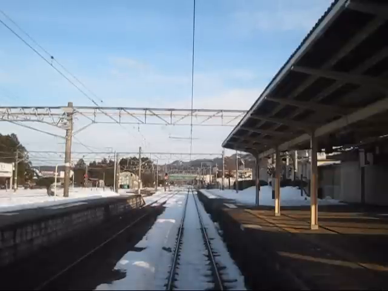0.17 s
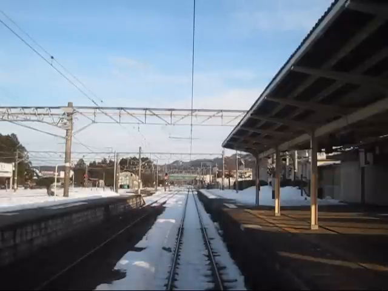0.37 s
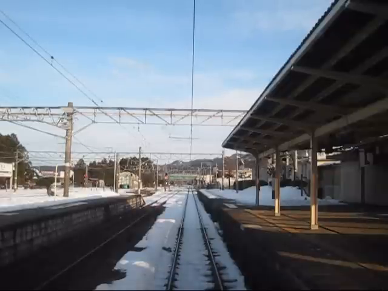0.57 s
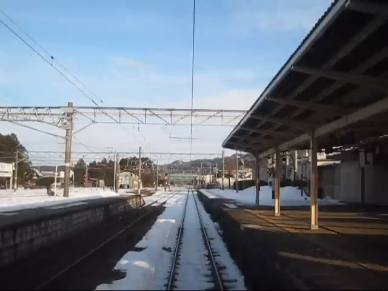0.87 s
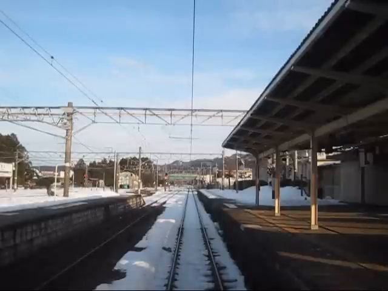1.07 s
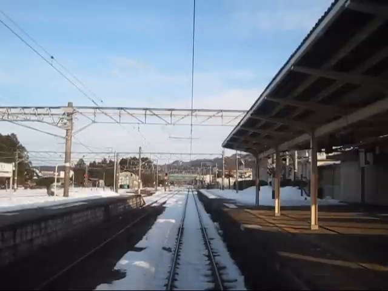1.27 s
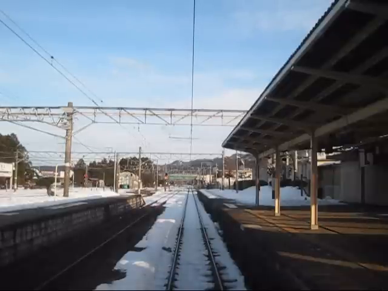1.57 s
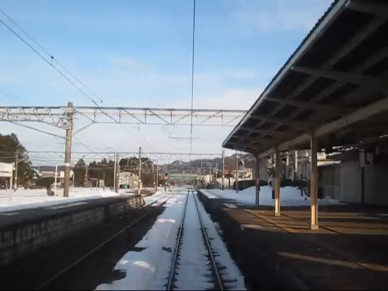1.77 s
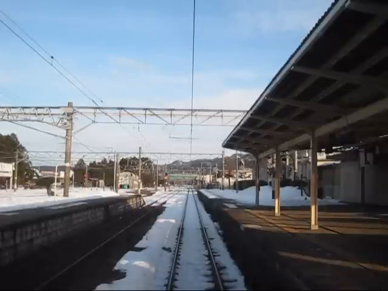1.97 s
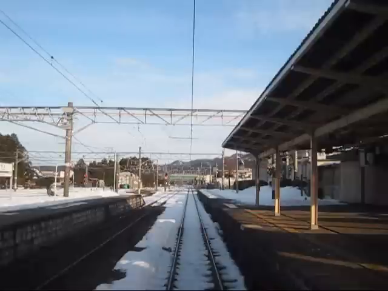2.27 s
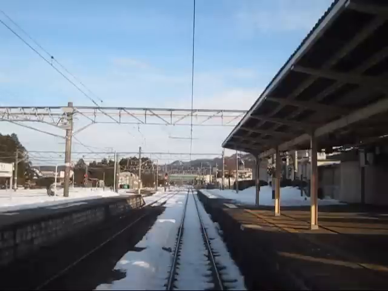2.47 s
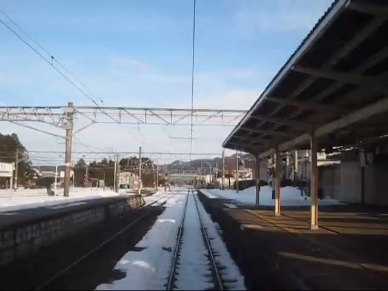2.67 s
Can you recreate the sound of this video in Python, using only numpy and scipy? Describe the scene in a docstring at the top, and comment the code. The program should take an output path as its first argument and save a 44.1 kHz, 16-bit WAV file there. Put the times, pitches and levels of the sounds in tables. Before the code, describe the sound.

Steady pressurised air hiss with a breathy, whistling colour, heard close inside a train cab. Low machinery drone and uneven floor rumble lie beneath; late on, the jet sinks and soft, dull clunks cluster at the end.

```python
"""Compressed air vents from a valve, heard inside the cab of a standing train: the jet swells, then sinks
as the pressure falls. It is noise in four bands, coloured by the valve housing, nozzle, pipes and small cab.
Thin high hisses, narrow bands of noise, hold at the start and fade.
Near the end the car body clunks as decaying sines, and a dull rushing noise grows under the last clunks.
Behind it all, shaped noise makes the floor rumble, a steady machinery drone and the cab air."""
import sys
import numpy as np
from scipy import signal
from scipy.fft import rfft, irfft, next_fast_len
from scipy.io import wavfile
from scipy.ndimage import uniform_filter1d, map_coordinates

SR = 44100
rng = np.random.default_rng(int(sys.argv[2]) if len(sys.argv) > 2 else 0)


def unload_audio(sound):
    """Save the sound as a 16-bit wav file, at the path given as the first command line argument."""
    columns = np.transpose(np.atleast_2d(sound))
    # keep every value between -1 and 1, then stretch to whole-number steps
    steps = np.round(np.clip(columns, -1, 1) * 32767)
    wavfile.write(sys.argv[1], SR, steps.astype(np.int16))


N = 123479

# Cab air noise, spectrum: [f/Hz, relative gain/dB]
AIR_COLOUR = [(120, -13), (200, 0.5), (343, -2), (831, -8), (1060, 0.5), (1150, -7), (1500, -7),
              (1950, -86), (3300, -120)]
# Steady machinery, resonances: [f/Hz, width/Hz, relative level/dB]
DRONE_PEAKS = [(147, 19, -3.5), (229, 30, 1), (300, 23, -2.5), (458, 34, -7.5)]
AIR_DB, DRONE_DB = -44, -44  # rms levels

# Vibration through the floor: [t/s, deep level/dB, boom level/dB]
RUMBLE_LEVELS = [(0.0, -47, -35), (0.06, -38, -52), (0.56, -44, -52), (1.1, -34.5, -31.5), (1.16, -38, -39),
                 (1.21, -39.5, -29.5), (1.35, -28.5, -36), (1.48, -34, -30.5), (1.78, -26.5, -36),
                 (2.3, -39, -42), (2.39, -25.5, -29.5), (2.47, -28.5, -35), (2.55, -27, -38.5),
                 (2.63, -32, -37)]
# Deep part, spectrum: [f/Hz, relative gain/dB]
DEEP_COLOUR = [(12, -35), (20, -6), (54, -1), (130, -6), (170, -36), (290, -120)]
# Boomy part, resonances: [f/Hz, width/Hz, relative level/dB]
BOOM_PEAKS = [(162, 19.5, -7), (122, 19, -9), (196, 68, -20)]

# Dull rushing noise, resonances: [f/Hz, width/Hz, relative level/dB]
SCRAPE_PEAKS = [(373, 120, -1), (600, 390, 1)]
SCRAPE_END_DB, SCRAPE_RISE_DB_PER_S, SCRAPE_PATCHY_DB = -36, 150, 1.5

# Blows to the car body: [t/s, gain/dB, extra gain of the modes above the lowest/dB]
BLOWS = [(2.372, -16, -10), (2.394, -24, -3), (2.675, -13, 4), (2.693, -10.5, 3.5), (2.707, -7, 6.5),
         (2.723, -10, -6), (2.759, -13, 2), (2.775, -7, -17), (2.786, -15, -21)]
# Ringing modes of the car body: [f/Hz, relative level/dB, t60/s]
BODY_MODES = [(72.4, 8, 0.05), (151.7, -8.5, 0.15), (213, -13, 0.044), (298, -14.5, 0.045),
              (390, -24, 0.029), (527, -26, 0.024)]
CLUNK_RISE_S = 0.0029

# Thin high hisses at the start: [f/Hz, width/Hz, level/dB, hold/s, t60/s]
SPIT_BANDS = [(9700, 700, -31, .1, .4), (10130, 120, -39, .26, .15)]

# Jet level in each band: [t/s, low level/dB, body level/dB, middle level/dB, treble level/dB]
JET_LEVELS = [(0.0, -40, -20, -31, -34), (0.27, -38, -21, -31, -33.5), (0.33, -33, -20.5, -29, -31.5),
              (0.37, -33.5, -17.5, -28, -31.5), (0.61, -37, -19, -29.5, -32.5),
              (0.65, -39.5, -21, -30, -33.5), (0.72, -39, -18.5, -31.5, -33),
              (1.25, -39.5, -20.5, -30, -32.5), (2.42, -44.5, -25.5, -36, -37.5),
              (2.46, -55, -24.5, -36, -39), (2.49, -41.5, -26, -35.5, -35.5), (2.7, -50, -27.5, -38, -42.5),
              (2.77, -53, -31.5, -43, -43), (2.78, -50, -30.5, -43.5, -45), (2.8, -53, -29.5, -41, -42)]
BODY_HZ, MIDDLE_HZ, TREBLE_HZ = 1450, 4000, 7900  # lower edges of the upper three bands
# Broad hiss of the jet, spectrum: [f/Hz, relative gain/dB]
JET_COLOUR = [(200, -53), (350, -26.5), (835, -24.5), (1440, -23), (1730, -14), (2250, -3), (3000, -11),
              (3800, -17), (5000, -18.5), (7890, -24.5), (8600, -16.5), (9600, -15), (10300, -19.5),
              (11500, -21), (12400, -26), (13000, -26), (15600, -35)]
# Broad resonances of the valve housing: [f/Hz, width/Hz, relative level/dB]
HOUSING_PEAKS = [(1069, 94, -13.5), (1240, 55, -16), (1771, 34.6, 6), (1715, 60, -2), (2236, 155, 2),
                 (2786, 73, -12), (2837, 68, -7.5), (3360, 140, -10), (3511, 164, -6), (4105, 98, -12.5),
                 (4550, 35, -8.5), (4730, 99, -11), (5056, 44, -13), (5376, 99, -11.5)]
# High resonances of the nozzle: [f/Hz, width/Hz, relative level/dB]
NOZZLE_PEAKS = [(6150, 30, 4.5), (6590, 70, 2.5), (7036, 35, -3), (8770, 510, 8), (9040, 40, 11.5),
                (9550, 460, 6), (10200, 50, 8), (10300, 66, 5), (10700, 43, 1), (11600, 65, 5),
                (12900, 300, -10)]
# Narrow resonances of the pipes, used relative to the strongest: [f/Hz, level/dB]
PIPE_TONES = [(1050, -48), (1803, -37), (1852, -42), (2067, -37), (2164, -36), (2207, -33), (2283, -35),
              (2336, -35), (2412, -40), (2466, -40), (2589, -41), (2654, -44), (2778, -44), (2864, -41),
              (3182, -47), (3338, -43), (3472, -41), (3537, -40), (3967, -50), (4032, -49), (4554, -48),
              (4710, -47), (4980, -47), (5459, -49)]
PIPE_WIDTH_HZ = 9.7
# Cancellations in the cab: [f/Hz, width/Hz, depth/dB]
CAB_NOTCHES = [(3105, 50, -14), (5290, 180, -9), (7980, 120, -7), (10500, 200, -4)]
BROAD_DB, HOUSING_DB, NOZZLE_DB, PIPES_DB = -7.5, -7, -25, 4.5  # mix of the jet's paths
FLUTTER_DB, JET_PATCHY_DB = 0.58, 0.37
CAB_T60_S, CAB_DB = 0.17, -0.5  # dense cab echoes, level against the direct hiss

LOW_CUT_HZ, TOP_HZ = 15, 15700  # limits at the microphone


def amp(db):
    """Amplitude factor of a level in dB."""
    return 10 ** (np.asarray(db) / 20)


def unit(x):
    """Scale to rms 1."""
    return x / np.sqrt(np.mean(x ** 2) + 1e-20)


def along(points, hz):
    """Amplitude response through (f/Hz, gain/dB) points, joined on a log frequency axis."""
    f, db = np.transpose(points)
    return amp(np.interp(np.log(hz + 1), np.log(f + 1), db))


def curves(rows):
    """One value per sample for each column after the time."""
    t, *columns = np.transpose(rows)
    return [np.interp(np.arange(N) / SR, t, column) for column in columns]


def wobble(rate):
    """A smooth random curve through `rate` knots a second."""
    knots = rng.standard_normal(int(N * rate / SR) + 4)
    return map_coordinates(knots, [np.arange(N) * rate / SR])


def filtered(x, response):
    """Multiply the spectrum of x by a response of frequency."""
    m = next_fast_len(N + SR // 2)
    spectrum = rfft(x, m) * response(np.fft.rfftfreq(m, 1 / SR))
    return irfft(spectrum, m)[..., :N]


def humps(peaks, hz):
    """Summed power of steep resonances given as (f/Hz, width/Hz, level/dB)."""
    return sum(amp(2 * db) / (1 + (2 * (hz - centre) / width) ** 2) ** 2 for centre, width, db in peaks)


def noise(response, patchy_db):
    """Coloured noise of rms 1, its gain varying at random in patches of time and frequency."""
    z = signal.stft(rng.standard_normal(N + 512), nperseg=512)[2]
    across_bins = uniform_filter1d(rng.standard_normal(z.shape), size=6, axis=0)
    patches = unit(uniform_filter1d(across_bins, size=14, axis=1))
    patchy = signal.istft(z * amp(patchy_db * patches), nperseg=512)[1][:N]
    return unit(filtered(patchy, response))


def resonant_noise(peaks, patchy_db):
    """Patchy noise of rms 1 shaped by resonances."""
    return noise(lambda f: np.sqrt(humps(peaks, f)), patchy_db)


def cab_air():
    """Steady broad air noise that fills the cab."""
    return amp(AIR_DB) * noise(lambda f: along(AIR_COLOUR, f), patchy_db=0.2)


def machinery_drone():
    """Steady machinery as noise through low resonances."""
    return amp(DRONE_DB) * resonant_noise(DRONE_PEAKS, patchy_db=3.5)


def floor_rumble():
    """Deep and boomy vibration through the floor, two noises with their own unsteady levels."""
    deep_db, boom_db = curves(RUMBLE_LEVELS)
    deep = amp(deep_db + 2.6 * wobble(12.32)) * noise(lambda f: along(DEEP_COLOUR, f), patchy_db=1.9)
    boom = amp(boom_db + 0.63 * wobble(7.9)) * resonant_noise(BOOM_PEAKS, patchy_db=-1.6)
    return deep + boom


def scrape():
    """A dull rushing noise grows exponentially under the last clunks."""
    seconds_left = np.arange(N)[::-1] / SR
    level_db = SCRAPE_END_DB - SCRAPE_RISE_DB_PER_S * seconds_left
    return amp(level_db) * resonant_noise(SCRAPE_PEAKS, SCRAPE_PATCHY_DB)


def clunks():
    """Each soft blow pushes the car body and rings its low modes, which decay exponentially."""
    onset, gain_db, upper_db = np.transpose(BLOWS)[:, :, None]
    t = np.maximum(np.arange(N) / SR - onset, 0)  # one row per blow
    ring = 0
    for k, (hz, db, t60) in enumerate(BODY_MODES):
        mode_db = db + upper_db * (k > 0) - 60 * t / t60
        ring = ring + amp(mode_db) * np.sin(2 * np.pi * hz * t)
    soft_onset = 1 - np.exp(-t / CLUNK_RISE_S)
    return -np.sum(amp(gain_db) * ring * soft_onset, axis=0)


def spits():
    """Thin high hisses, narrow bands of noise that hold from the start, then decay exponentially."""
    t = np.arange(N) / SR
    total = 0
    for hz, width, db, hold, t60 in SPIT_BANDS:
        fading_db = db - 60 * np.maximum(t - hold, 0) / t60
        total = total + amp(fading_db) * resonant_noise([(hz, width, 0)], patchy_db=-3.5)
    return total


def cab(x):
    """Direct sound plus a short dense tail from the cab, which combs the spectrum finely."""
    t = np.arange(SR // 3) / SR
    tail = rng.standard_normal(len(t)) * amp(-60 * t / CAB_T60_S)
    echoes = signal.fftconvolve(x, tail / np.linalg.norm(tail))[:N]
    return x + amp(CAB_DB) * echoes


def valve_rings(hz):
    """Amplitude response of housing, nozzle and pipes, their powers added."""
    top_db = max(db for _, db in PIPE_TONES)
    pipes = [(f, PIPE_WIDTH_HZ, db - top_db) for f, db in PIPE_TONES]
    paths = [(HOUSING_DB, HOUSING_PEAKS), (NOZZLE_DB, NOZZLE_PEAKS), (PIPES_DB, pipes)]
    return np.sqrt(sum(amp(2 * db) * humps(peaks, hz) for db, peaks in paths))


def notched_bands(hz):
    """Responses of the jet's four bands, low to treble, all with the cab's cancellations."""
    dips = amp(sum(db * humps([(centre, width, 0)], hz) for centre, width, db in CAB_NOTCHES))
    above_body, above_middle, above_treble = [1 / (1 + (edge / (hz + 1)) ** 20)
                                              for edge in (BODY_HZ, MIDDLE_HZ, TREBLE_HZ)]
    return dips * np.array([1 - above_body, above_body - above_middle,
                            above_middle - above_treble, above_treble])


def jet():
    """Turbulent air heard across the cab and through housing, nozzle and pipes; each band has its own level."""
    broad_source = cab(noise(np.ones_like, JET_PATCHY_DB))
    broad = filtered(broad_source, lambda f: amp(BROAD_DB) * along(JET_COLOUR, f))
    ringing = filtered(noise(np.ones_like, JET_PATCHY_DB), valve_rings)
    bands = filtered(broad + ringing, notched_bands)
    levelled = sum(amp(db) * unit(band) for db, band in zip(curves(JET_LEVELS), bands))
    return amp(FLUTTER_DB * wobble(7.23)) * levelled


def scene():
    """All sources, background to foreground, at one microphone in the cab."""
    background = cab_air() + machinery_drone() + floor_rumble()
    return (background + scrape() + clunks() + spits() + jet())[None]


def record(dry):
    """The microphone rolls off the deepest bass (two first-order stages) and passes nothing from TOP_HZ up."""
    return filtered(dry, lambda hz: (hz < TOP_HZ) * (1j * hz / (LOW_CUT_HZ + 1j * hz)) ** 2)


dry = scene()
out = record(dry)
unload_audio(out)
```